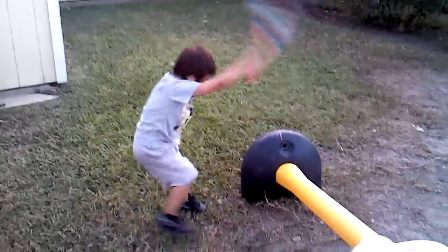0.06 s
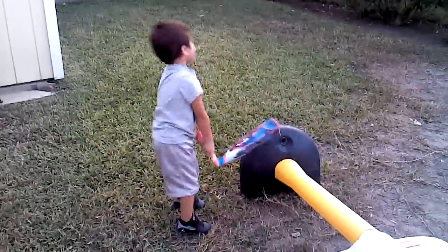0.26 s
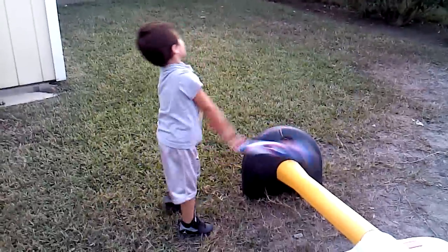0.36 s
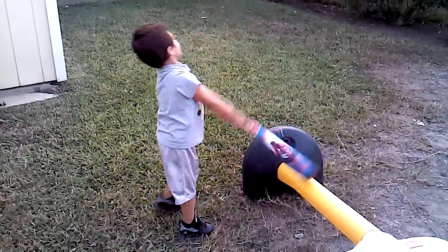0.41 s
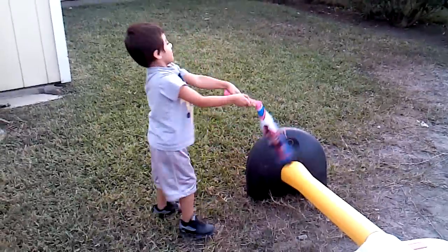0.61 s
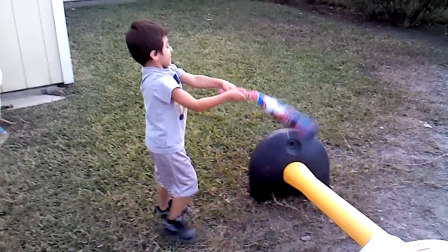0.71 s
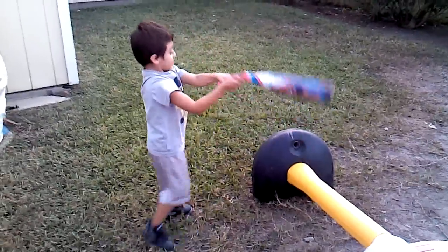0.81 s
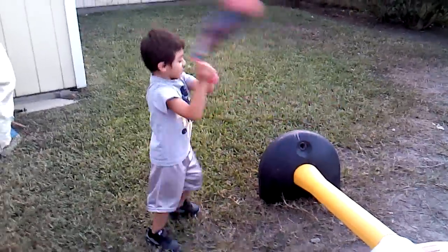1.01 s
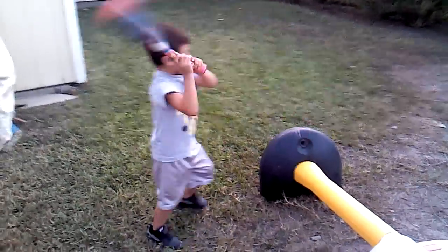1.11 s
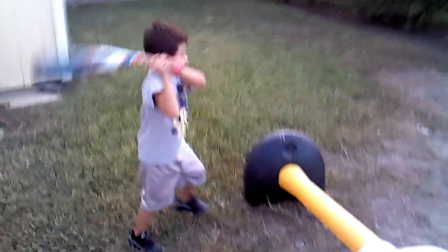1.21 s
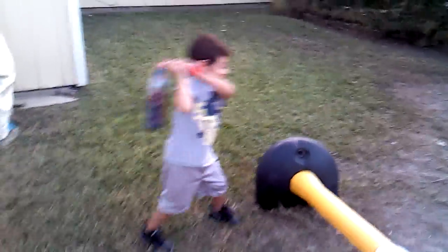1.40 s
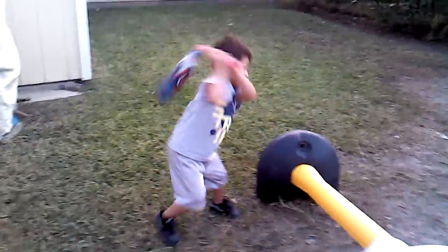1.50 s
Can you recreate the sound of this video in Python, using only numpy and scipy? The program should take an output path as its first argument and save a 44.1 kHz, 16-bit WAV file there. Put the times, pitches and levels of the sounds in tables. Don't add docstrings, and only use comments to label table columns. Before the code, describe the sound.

Single loud hollow plastic thump with a quick bouncing clatter and loose rattle dying away in an open yard; afterwards faint scrapes, grass steps and light plastic clicks, with distant engine drone and airy noise on a phone microphone.

```python
import sys
import numpy as np
from scipy import signal
from scipy.io import wavfile

SR = 44100
rng = np.random.default_rng(int(sys.argv[2]) if len(sys.argv) > 2 else 0)


def bounce(signal):
    frames = np.transpose(np.atleast_2d(signal))
    limited = np.clip(frames, -1, 1)
    pcm = np.round(limited * 32767).astype(np.int16)
    wavfile.write(sys.argv[1], SR, pcm)


def amplitude_ratio(level_db):
    exponent = np.asarray(level_db, float) / 20
    return 10 ** exponent


N = 68355


def rms_one(x):
    return x / np.sqrt(np.mean(x ** 2) + 1e-20)


def low(x, hz, order=2):
    return signal.sosfilt(signal.butter(order, hz, fs=SR, output="sos"), x)


def high(x, hz, order):
    return signal.sosfilt(signal.butter(order, hz, "high", fs=SR, output="sos"), x)


def resonate_twice(x, hz, q):
    b, a = signal.iirpeak(hz, q, fs=SR)
    return signal.lfilter(b, a, signal.lfilter(b, a, x))


def at_hz(points, hz):
    table = np.array(points)
    return np.interp(np.log(hz), np.log(table[:, 0]), table[:, 1])


def drift(rate):
    hop = 40
    r = np.exp(-2 * np.pi * rate * hop / SR)
    noise = rng.standard_normal(N // hop + 2002)
    slow = signal.lfilter([1], [1, -2 * r, r * r], noise)[2000:]
    return np.interp(np.arange(N) / hop, np.arange(len(slow)), rms_one(slow))


def ring(x, hz, t60):
    r = amplitude_ratio(-60 / (t60 * SR))
    w = 2 * np.pi * hz / SR
    return signal.lfilter([0, np.sin(w)], [1, -2 * r * np.cos(w), r * r], x + 1e-18)


def bands(spectrum, gain):
    edges = 20 * 2 ** np.arange(0, 9.8, 1 / 3)
    white = rng.standard_normal((2, N))
    out, power = 0, 0
    for k, (bottom, top) in enumerate(zip(edges, edges[1:])):
        hz = np.sqrt(bottom * top)
        level = amplitude_ratio(at_hz(spectrum, hz))
        band = signal.sosfilt(signal.butter(2, [bottom, top], "band", fs=SR, output="sos"), white[k % 2])
        out = out + level * gain(hz) * band
        power = power + level ** 2 * (top - bottom) * 2 / SR
    return out / np.sqrt(power)


# f/Hz, level/dB per Hz
AIR = [(12, -31), (20, -3), (105, -9), (426, -22), (636, -18.5), (1020, -23.5), (1320, -21.5),
       (1570, -28.5), (8000, -43.5), (10400, -58.5), (17600, -120)]
AIR_DB = -50


def air():
    gust = drift(4.5)

    def gain(hz):
        sway = (0.6 * gust + drift(30)) * min(1, 1500 / hz)
        return amplitude_ratio(sway - 4 * max(0, np.log2(hz / 6000)))

    return amplitude_ratio(AIR_DB) * bands(AIR, gain)


# t/s, f/Hz, level/dB
ENGINE = [(0, 89.6, -45.5), (.2, 89.15, -54), (.4, 94.6, -44.5), (0.551, 103.3, -56.5), (.68, 112.6, -45.5),
          (.8, 115.9, -46), (.93, 119, -39.5), (1.05, 119, -42), (1.2, 117.2, -44), (1.32, 112.9, -56),
          (1.55, 107, -58)]
ENGINE_WOBBLE_DB, ENGINE_WOBBLE_HZ = 0.6, 0.7


def engine():
    s, hz, db = np.transpose(ENGINE)
    t = np.arange(N) / SR
    pitch = np.interp(t, s, hz) + ENGINE_WOBBLE_HZ * drift(11.3)
    level = np.interp(t, s, db) + ENGINE_WOBBLE_DB * drift(3.3)
    return np.sqrt(2) * amplitude_ratio(level) * np.sin(2 * np.pi * np.cumsum(pitch) / SR)


# f/Hz, level/dB, width/Hz
HUMS = [
    (121.5, -51.5, 24),
    (151.6, -54.5, 20),
    (241.6, -66.5, 11),
]
MAINS_HZ, MAINS_DB = 241.8, -63


def hums():
    t = np.arange(N) / SR
    out = np.sqrt(2) * amplitude_ratio(MAINS_DB + 1.4 * drift(5)) * np.sin(2 * np.pi * MAINS_HZ * t)
    for hz, db, width in HUMS:
        t60 = 2.2 / width
        noise = rng.standard_normal(N + SR)
        out += amplitude_ratio(db) * rms_one(ring(ring(noise, hz, t60), hz, t60)[SR:])
    return out


# t/s, length/s, level/dB, brightness f/Hz
SHUFFLES = [
    (0.65, 0.06, -55, 9900),
    (0.651, 0.054, -50.5, 3080),
    (0.683, 0.031, -50.5, 2380),
    (0.704, 0.053, -51.5, 1820),
    (0.736, 0.25, -58.5, 1730),
    (1.031, 0.11, -51.5, 2560),
    (1.093, 0.043, -45.5, 11290),
    (1.146, 0.073, -48.5, 1300),
    (1.215, 0.17, -56.5, 2380),
    (1.413, 0.066, -54.5, 6000),
]
# f/Hz, width/Hz, level/dB
SHUFFLE_PEAKS = [
    (655, 140, 2),
    (1950, 560, -2),
    (6000, 514, -29),
]
BLADES_PER_S, BLADE_SPREAD_DB, SHUFFLE_LOW_HZ = 9000, 2.5, 450


def shuffles():
    sizes = amplitude_ratio(BLADE_SPREAD_DB * np.minimum(rng.exponential(1, N), 3))
    ticks = (rng.random(N) < BLADES_PER_S / SR) * sizes * rng.choice([-1, 1], N)
    ticks = high(ticks, SHUFFLE_LOW_HZ, order=2)
    colour = 0
    for hz, width, db in SHUFFLE_PEAKS:
        colour = colour + amplitude_ratio(db) * signal.lfilter(*signal.iirpeak(hz, hz / width, fs=SR), ticks)
    ticks = ticks + colour
    t, out = np.arange(N) / SR, 0
    for s, length, db, hz in SHUFFLES:
        stroke = np.sin(np.pi * np.clip((t - s) / length, 0, 1) ** 0.8).clip(0)
        out = out + amplitude_ratio(db) * stroke * rms_one(low(ticks, hz, order=3))
    return out


# t/s, length/s, level/dB, f/Hz
DRAGS = [
    (0.6, 0.029, -58.5, 5850),
    (.66, 0.021, -58, 3900),
    (.688, 0.022, -53, 1980),
    (.711, 0.019, -52.5, 1920),
    (0.78, .022, -54.5, 1520),
    (.706, 0.031, -54, 640),
]
DRAG_Q = 9


def drags():
    t, noise, out = np.arange(N) / SR, rng.standard_normal(N), 0
    for s, length, db, hz in DRAGS:
        stroke = np.sin(np.pi * np.clip((t - s) / length, 0, 1)).clip(0)
        out = out + amplitude_ratio(db) * stroke * rms_one(resonate_twice(noise, hz, DRAG_Q))
    return out


CLICK_S = [1.0570, 1.0574, 1.0632, 1.0638, 1.065, 1.0765, 1.0835, 1.0858, 1.086, 1.1022, 1.104, 1.105,
           1.1122, 1.1122, 1.1122]
# peak level/dB, centre f/Hz, length/s
CLICKS = [(-31, 1100, 0.0035), (-34, 2130, 0.00083), (-29.5, 486, 0.0017), (-28.5, 226, 0.0079),
          (-39, 2100, 0.0026), (-39, 1000, .004), (-31, 2330, 0.0032), (-28, 840, 0.0027),
          (-38.5, 320, 0.0081), (-26, 840, 0.012), (-28.5, 245, 0.004), (-24.5, 2320, 0.0034),
          (-29, 2900, 0.00085), (-26.5, 7300, 0.0016), (-27.5, 2500, 0.00089)]
CLICK_Q, CLICK_RISE_S = 0.8, 0.0004
CLICK_TOP_RATIO = 1.84


def clicks():
    out, t = np.zeros(N), np.arange(1200) / SR
    for s, (db, hz, length) in zip(CLICK_S, CLICKS):
        envelope = np.exp(-t / length * 2) * (1 - np.exp(-t / CLICK_RISE_S))
        tone = resonate_twice(rng.standard_normal(len(t)) * envelope, hz, CLICK_Q)
        tone = low(tone, min(CLICK_TOP_RATIO * hz, SR / 2.5), order=3)
        start = int(s * SR)
        out[start:start + len(t)] += amplitude_ratio(db) * tone / np.abs(tone).max()
    return out


# f/Hz, level/dB per Hz
RATTLE = [(59, -27), (100, -5.5), (229, -2.5), (524, -16), (891, -14), (1760, -20.5), (9410, -32),
          (12700, -47), (16000, -127)]
# f/Hz, T60/s
RATTLE_T60 = [(100, 0.34), (500, 0.26), (2000, 0.24), (8000, 0.037)]
# f/Hz, T60/s
YARD_T60 = [(150, 0.464), (1000, 0.31), (4000, 0.47), (10000, 0.21)]
YARD_DB = -7
RATTLE_S, RATTLE_RISE_S, RATTLE_HOLD_S, RATTLE_DB = 0.198, 0.003, 0.017, -21


def rattle():
    t = np.maximum(np.arange(N) / SR - RATTLE_S, 0)
    rise = 1 - np.exp(-t / RATTLE_RISE_S)
    late = np.maximum(t - RATTLE_HOLD_S, 0)

    def gain(hz):
        direct = amplitude_ratio(-60 * late / at_hz(RATTLE_T60, hz))
        yard = amplitude_ratio(YARD_DB - 60 * t / at_hz(YARD_T60, hz))
        return rise * (direct + yard)

    return amplitude_ratio(RATTLE_DB) * bands(RATTLE, gain)


CONTACT_S = [.1985, .2008, .2052, .2100, .2121, .2142, .2195, .2245, .2300, .2570]
# boom level/dB, wall level/dB, rim level/dB
CONTACTS = [
    (-60, -48, -18),
    (-13.5, -24.5, -30),
    (-31, -28, -11.5),
    (-50, -20, -9),
    (-56, -8.5, -37),
    (-54, -13.5, -10),
    (-25.5, -15, -22.5),
    (-21.5, -24.5, -29),
    (-25.5, -14.5, -20.5),
    (-41, -39, -40),
]
SPOT_SPREAD_DB = 3


def struck(modes, column, sign):
    rows, out = np.array(CONTACTS), 0
    at = (np.array(CONTACT_S) * SR).astype(int)
    spots = SPOT_SPREAD_DB * rng.standard_normal((len(rows), len(modes)))
    for k, (hz, db, t60) in enumerate(modes):
        impulses = np.zeros(N)
        impulses[at] = sign * amplitude_ratio(rows[:, column] + db + spots[:, k])
        out = out + ring(impulses, hz, t60)
    return out


# f/Hz, level/dB, T60/s
BOOM = [(140, -10.5, 0.058), (161.5, -5.5, 0.14), (188.6, -4.5, .12), (199, -3.5, 0.11), (268.3, -5.5, .22),
        (298, -10, 0.057), (332, -3, 0.089), (404, -21, 0.058)]
WALL = [(724, -5, 0.085), (861, -6, 0.077), (925, 2, 0.016), (1205, -9, 0.073)]
RIM = [(1452, -13, 0.038), (1540, -8, 0.032), (1751, -6.5, 0.063), (1906, -6.5, .03), (2133, -13.5, 0.049),
       (3434, -13, 0.032), (3856, -12, 0.03), (4770, -24.5, 0.036)]
BOOM_CONTACT_HZ, WALL_CONTACT_HZ, RIM_CONTACT_HZ = 494, 1300, 6000
SHELL_LOW_HZ = 86.4
SHELL_DIP_HZ, SHELL_DIP_Q, SHELL_DIP_SHARE = 527, 3.2, 0.64
SLAP_S, SLAP_DB, SLAP_CUT_HZ = 0.12, -35.5, 2900


def blow():
    boom = low(struck(BOOM, column=0, sign=-1.2), BOOM_CONTACT_HZ)
    wall = low(struck(WALL, column=1, sign=0.96), WALL_CONTACT_HZ)
    rim = low(struck(RIM, column=2, sign=1.0), RIM_CONTACT_HZ)
    hit = high(boom + wall + rim + rattle(), SHELL_LOW_HZ, order=4)
    gap = signal.lfilter(*signal.iirpeak(SHELL_DIP_HZ, SHELL_DIP_Q, fs=SR), hit)
    hit = hit - SHELL_DIP_SHARE * gap
    slap = np.roll(low(hit, SLAP_CUT_HZ), int(SLAP_S * SR))
    return hit + amplitude_ratio(SLAP_DB) * slap


def scene():
    return (air() + blow() + clicks() + shuffles() + engine() + hums() + drags())[None]


def top_cut(x):
    return signal.sosfilt(signal.butter(12, 16750, fs=SR, output="sos"), x)


# start t/s, end t/s, lost above f/Hz
DROPOUTS = [
    (.184, .1965, 2200),
    (.206, .318, 13900),
    (.238, .272, 9800),
    (.268, .3, 10800),
    (.296, .31, 11800),
    (1.113, 1.135, 13800),
]
HISS_DB, HISS_TOP_HZ, CUTOFF_HZ = -61, 16900, 16750


def record(dry):
    hiss_filter = signal.cheby2(12, 50, HISS_TOP_HZ, fs=SR, output="sos")
    hiss = signal.sosfilt(hiss_filter, rng.standard_normal(dry.shape))
    x = 0.85 * np.tanh(dry / 0.85) + amplitude_ratio(HISS_DB) * hiss
    x = signal.sosfilt(signal.cheby2(12, 70, CUTOFF_HZ, fs=SR, output="sos"), x)
    t = np.arange(N) / SR
    for start, end, hz in DROPOUTS:
        kept = signal.sosfiltfilt(signal.cheby2(10, 40, hz, fs=SR, output="sos"), x)
        gate = np.clip(np.minimum(t - start, end - t) / 0.001, 0, 1)
        x = x + gate * (kept - x)
    return top_cut(x)


dry = scene()
out = record(dry)
bounce(out)
```